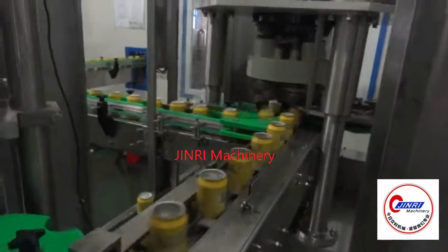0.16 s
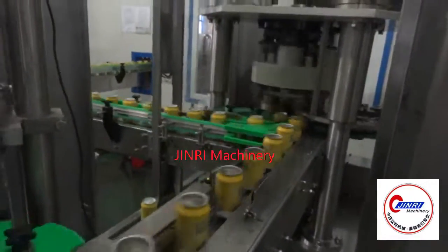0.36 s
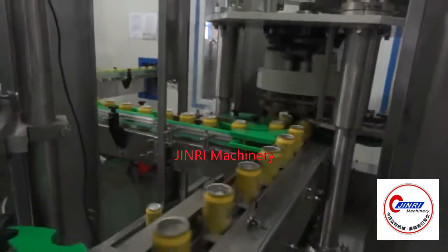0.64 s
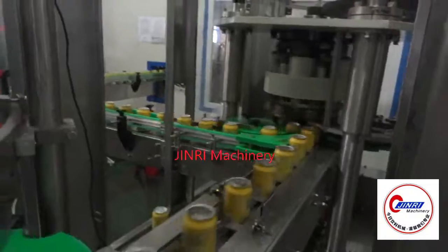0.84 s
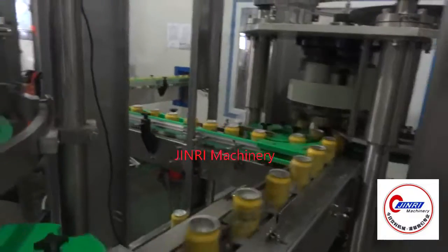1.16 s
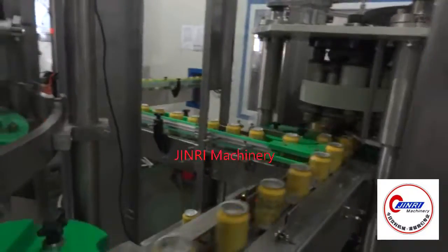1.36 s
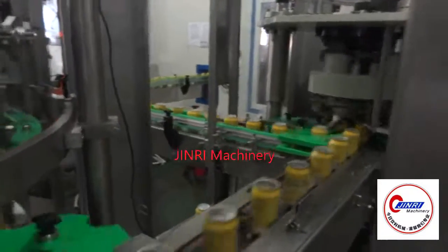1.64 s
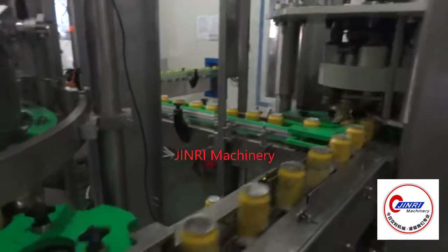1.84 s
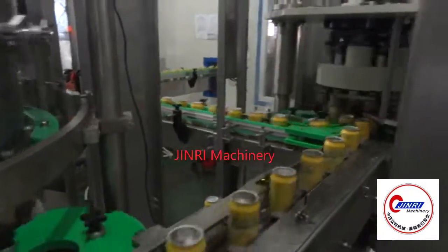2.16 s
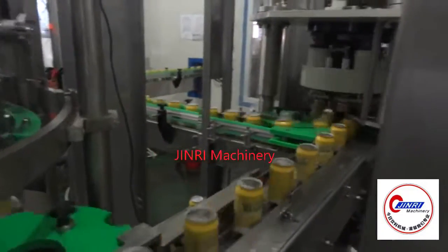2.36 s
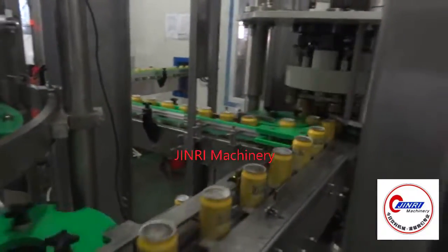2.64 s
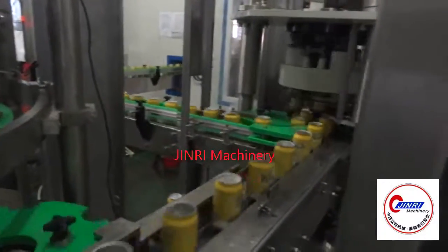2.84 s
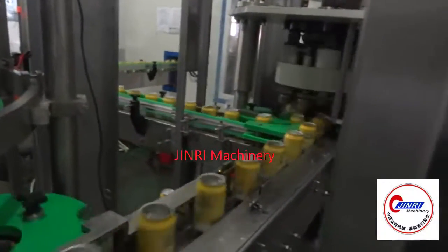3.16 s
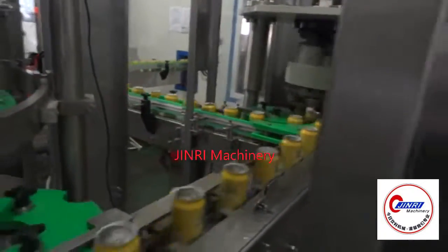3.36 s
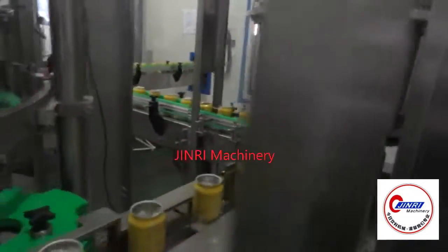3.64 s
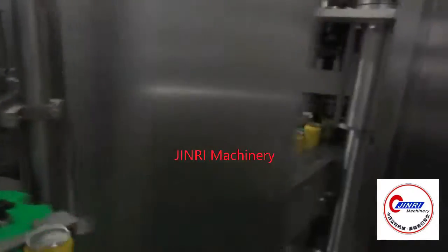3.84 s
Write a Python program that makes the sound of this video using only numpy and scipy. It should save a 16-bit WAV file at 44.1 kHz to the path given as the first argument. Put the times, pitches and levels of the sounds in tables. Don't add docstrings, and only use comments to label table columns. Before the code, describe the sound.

Regular bright hissing surges ring inside passing cans, with short metallic knocks between them. A low motor rumble dips once per cycle under constant airy machine noise, picked up near the line in a reflective hall.

```python
import sys
import numpy as np
from scipy import signal
from scipy.io import wavfile

SR = 44100
rng = np.random.default_rng(int(sys.argv[2]) if len(sys.argv) > 2 else 0)


def level_to_linear(level):
    exponent = np.asarray(level, float) / 20
    return 10 ** exponent


def dump(signal):
    limited = np.clip(np.atleast_2d(signal).T, -1, 1)
    pcm = np.round(limited * 32767).astype(np.int16)
    wavfile.write(sys.argv[1], SR, pcm)


N = 176400
T = np.arange(N) / SR


def rms_one(x):
    return x / np.sqrt(np.mean(np.abs(x) ** 2) + 1e-20)


def at_hz(points, hz):
    table_hz, table_db = np.transpose(points)
    return np.interp(np.log(hz), np.log(table_hz), table_db)


def drift(rate_hz):
    hop = 40
    pole = np.exp(-2 * np.pi * rate_hz * hop / SR)
    noise = rng.standard_normal(N // hop + 2002)
    slow = signal.lfilter([1], [1, -2 * pole, pole * pole], noise)[2000:]
    return np.interp(np.arange(N) / hop, np.arange(len(slow)), rms_one(slow))


def stereo(mid, side, hz):
    # (frequency [Hz], level [dB])
    side_levels = [(60, -55), (220, -40), (400, -21), (700, -17), (1300, -14.5), (2400, -12.5), (4400, -12),
                   (8500, -13), (13000, -24)]
    left_share, patchy_db = 0.3, 2.5
    side = side * level_to_linear(patchy_db * drift(2.3)) + left_share * mid
    return mid + level_to_linear(at_hz(side_levels, hz)) * side * np.array([[1], [-1]])


def banded_noise(spectrum, patchy_db):
    together = drift(2.1)
    lowest_hz, highest_hz = spectrum[0][0], min(spectrum[-1][0], 17000)
    edges_hz = lowest_hz * 2 ** np.arange(0, np.log2(highest_hz / lowest_hz), 0.5)
    white = rng.standard_normal((2, 2, N))
    out = 0
    for k, low in enumerate(edges_hz):
        high = low * 2 ** 0.5
        band = signal.butter(2, [low, high], "band", fs=SR, output="sos")
        mid, side = signal.sosfilt(band, white[k % 2])
        hz = np.sqrt(low * high)
        level_db = at_hz(spectrum, hz) + patchy_db * (0.43 * together + drift(22.0))
        out = out + level_to_linear(level_db) * stereo(mid, side, hz)
    return rms_one(out)


def resonance(hz, width_hz):
    step, flutter_db = 4, 2.5
    pole = np.exp(-2 * np.pi * width_hz * 0.81 * step / SR)
    noise = rng.standard_normal((4, N // step + 1))
    slow = signal.lfilter([1], [1, -2 * pole, pole * pole], noise)
    a, b, c, d = [np.interp(np.arange(N) / step, np.arange(len(v)), v) for v in slow]
    phase = 2 * np.pi * np.cumsum(hz + 0 * T) / SR
    cos, sin = np.cos(phase), np.sin(phase)
    mid, side = a * cos + b * sin, c * cos + d * sin
    return rms_one(stereo(mid, side, np.mean(hz))) * level_to_linear(flutter_db * drift(11.8))


def bell(age, peak_s, length_s):
    return np.exp(-0.5 * ((age - peak_s) / length_s) ** 2)


def nozzle_opening(events):
    attack_s, release_db_per_s, knee_s = 0.011, 64.5, 0.016
    opening = 0
    for start, level_db, hold_s in events:
        age = np.maximum(T - start, 0)
        released_s = knee_s * np.logaddexp(0, (age - hold_s) / knee_s)
        opening = opening + np.clip(age / attack_s, 0, 1) * level_to_linear(level_db - release_db_per_s * released_s)
    return opening


def jets():
    # (start [s], level [dB], hold [s])
    jet_events = [(-.245, 1, 0.25), (0.198, 1, 0.24), (0.662, 1, 0.18), (1.09, 0.5, 0.25), (1.534, 0, 0.25),
                  (1.982, 0, 0.26), (2.431, 0.5, 0.26), (2.906, 0.5, 0.26), (3.329, 0.5, 0.26),
                  (3.779, 1, 0.26)]
    # (low level [dB], middle level [dB], high level [dB], pitch [ratio])
    can_rings = [(0.1, 3, 1, 1.001), (-0.5, 1, 1.7, 1.01), (3.5, -3.1, -3.3, 1.001), (6, -1, 0.6, .99),
                 (1, 3.5, 3.7, 1.001), (2.8, 0.1, 1.7, .99), (5.5, 3, 2.5, 1.001), (3, -0.5, 3.2, 1.001),
                 (0.5, 1.5, 3, .99), (2.2, 1, 3.2, 1.001)]
    # (frequency [Hz], density [dB per Hz])
    hiss_spectrum = [(1500, -44), (2200, -6), (3000, -7.5), (4500, 1), (6500, -7), (9000, -4), (12500, -5),
                     (16000, -6.5)]
    # (first [Hz], last [Hz], width [Hz], level [dB], fade [dB/s])
    can_resonances = [
        (1488, 1280, 140, -25.5, 142),
        (2787, 2400, 61, -40.5, -5),
        (3428, 2780, 180, -29.5, 40),
        (4845, 4400, 250, -26, 158),
        (4424, 4200, 140, -32.5, -5.5),
        (3950, 3900, 260, -36.5, -18),
    ]
    # (frequency [Hz], width [Hz], level [dB], peak after onset [s], length [s])
    whistles = [
        (5490, 600, -26, 0.1, 0.031),
        (6770, 640, -30, 0.11, 0.028),
        (9300, 570, -35.5, 0.31, 0.18),
    ]
    hiss_db, patchy_db, swell_db_per_s = -22, 0.9, 8.5
    glide_s = 0.05

    start = np.transpose(jet_events)[0]
    low_db, middle_db, high_db, pitch = np.transpose(can_rings)
    now = np.clip(np.searchsorted(start, T) - 1, 0, None)
    age = T - start[now]
    out = level_to_linear(hiss_db + swell_db_per_s * age) * banded_noise(hiss_spectrum, patchy_db)

    for first, last, width, db, fade in can_resonances:
        if first < 2000:
            own_db = low_db
        elif first > 3700:
            own_db = high_db
        else:
            own_db = middle_db
        hz = pitch[now] * (last + (first - last) * np.exp(-age / glide_s))
        out += level_to_linear(db + own_db[now] - fade * age) * resonance(hz, width)

    for hz, width, db, peak, length in whistles:
        out += level_to_linear(db) * bell(age, peak, length) * resonance(hz * pitch[now], width)

    edge_hz = 5200 + 20000 * np.minimum(age, 0.3)
    out += level_to_linear(-28) * bell(age, 0.19, 0.096) * resonance(edge_hz, 1400)
    return nozzle_opening(jet_events) * out


def knocks():
    # (time [s], peak level [dB])
    knock_events = [
        (.185, -11),
        (.653, -16),
        (.995, -8),
        (1.518, -14),
        (1.972, -6),
        (2.421, -7),
        (2.831, -8.5),
        (3.33, -3),
        (3.795, -27),
    ]
    # (frequency [Hz], level [dB], 60 dB decay [s])
    body_modes = [
        (317, -11.5, 0.026),
        (573, -4, .07),
        (904, -4, 0.022),
        (1846, -2.5, 0.035),
        (3220, -12, .02),
        (6500, -3, .012),
    ]
    time_s, peak_db = np.transpose(knock_events)
    chance = rng.standard_normal((len(time_s), len(body_modes)))
    out = 0
    for k, (hz, level_db, t60) in enumerate(body_modes):
        clicks = np.full(N, 1e-18)
        clicks[(time_s * SR).astype(int)] = level_to_linear(peak_db + level_db - 9 + 2.2 * chance[:, k])
        decay, turn = level_to_linear(-60 / (t60 * SR)), 2 * np.pi * hz / SR
        out = out + signal.lfilter([0.5, 0, -0.5], [1, -2 * decay * np.cos(turn), decay * decay], clicks)
    return out


def drive():
    # (start [s], length [s], depth [dB])
    eases = [(0.236, 0.2, 9.5), (0.703, 0.19, 4.5), (1.144, 0.15, 9), (1.583, 0.19, 7.5),
             (2.039, 0.18, 8.5), (2.496, .15, 8.5), (2.951, 0.16, 7.5), (3.382, 0.18, 7.5), (3.82, 0.2, 8)]
    # (frequency [Hz], density [dB per Hz])
    rumble_spectrum = [(20, -46), (40, -44), (70, -23.5), (140, -12.5), (350, -9.5), (650, -6.5),
                       (1000, -11), (1500, -11), (2600, -15.5)]
    # (frequency [Hz], width [Hz], level [dB])
    frame_modes = [(615, 79, -30.5), (534.2, 75, -34), (366, 48, -39), (208.3, 12.5, -44.5)]
    fall_s, rise_s = 0.039, 0.048
    eased_db = 0
    for start, length, depth_db in eases:
        fall = np.tanh((T - start) / fall_s)
        rise = np.tanh((T - start - length) / rise_s)
        eased_db = eased_db + depth_db * 0.5 * (fall - rise)
    out = level_to_linear(-23) * banded_noise(rumble_spectrum, patchy_db=1.5)
    for hz, width, db in frame_modes:
        out += level_to_linear(db) * resonance(hz, width)
    return level_to_linear(-eased_db) * out


def hall():
    # (frequency [Hz], density [dB per Hz])
    roar_spectrum = [(200, -21), (600, -14), (1500, -24), (2300, -1), (4300, -9.5), (6200, -5.5),
                     (10500, -9), (16000, -34)]
    # (frequency [Hz], width [Hz], level [dB])
    whines = [(628.6, 62, -39.5), (2410, 33, -39), (4173, 81, -39.5), (5550, 35, -45.5), (7420, 49, -47.5),
              (10330, 130, -47), (2036, 130, -38.5)]
    out = level_to_linear(-27) * banded_noise(roar_spectrum, patchy_db=0.5)
    for hz, width, db in whines:
        out += level_to_linear(db) * resonance(hz, width)
    return out


def scene():
    return jets() + knocks() + drive() + hall()


def band_limit(x):
    return signal.sosfilt(signal.butter(12, 15470, fs=SR, output="sos"), x)


def record(dry):
    low_cut = signal.butter(2, 19, "high", fs=SR, output="sos")
    x = signal.sosfilt(low_cut, dry)
    mix = 0.9 * np.tanh(x / 0.9)
    return band_limit(mix)


dry = scene()
out = record(dry)
dump(out)
```